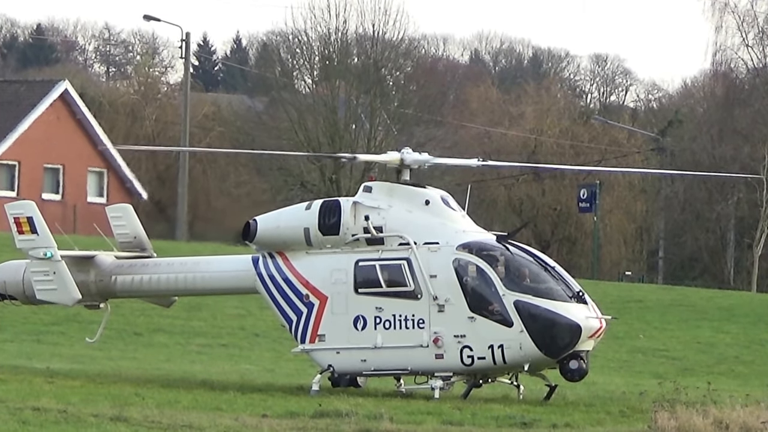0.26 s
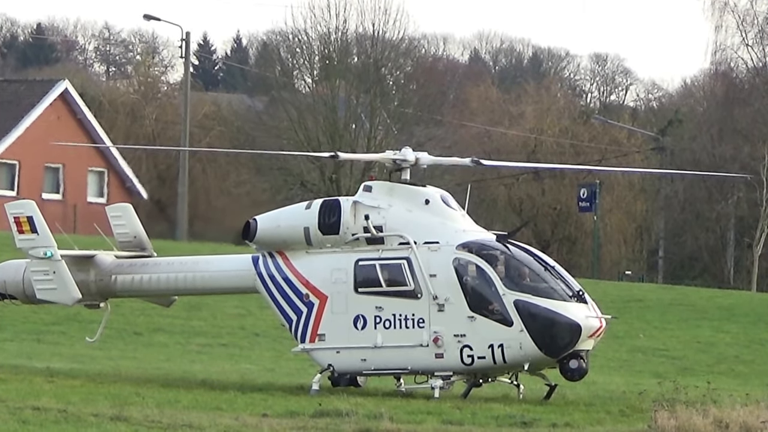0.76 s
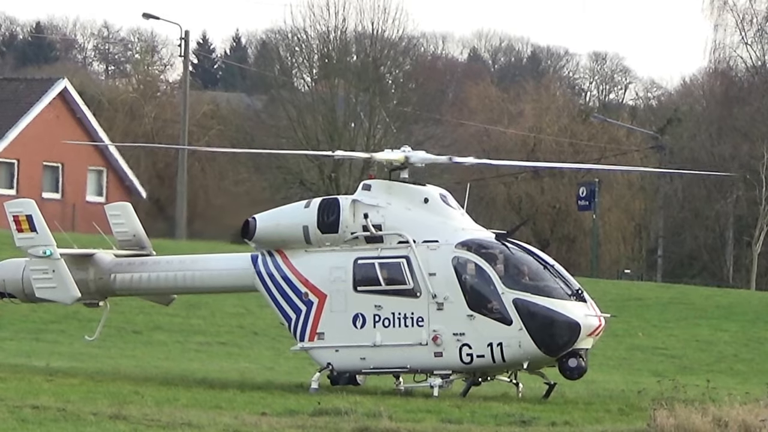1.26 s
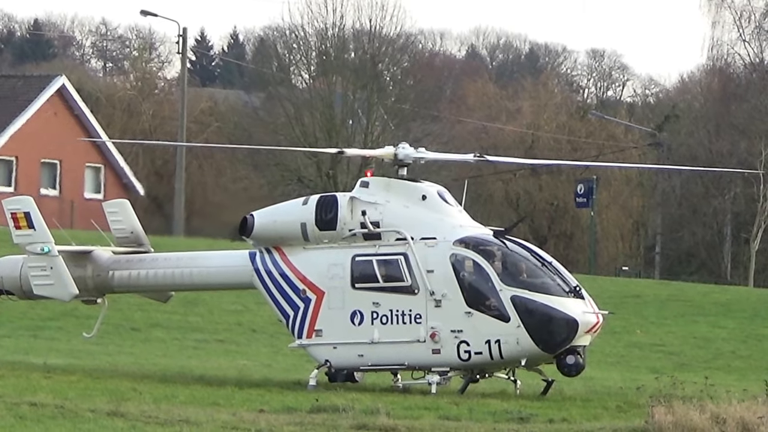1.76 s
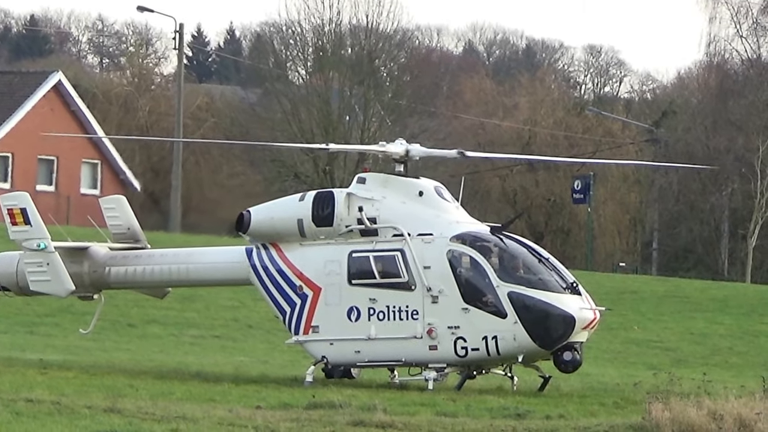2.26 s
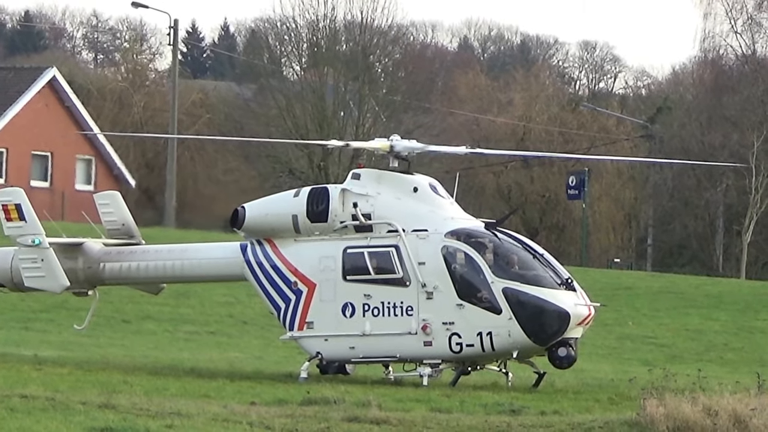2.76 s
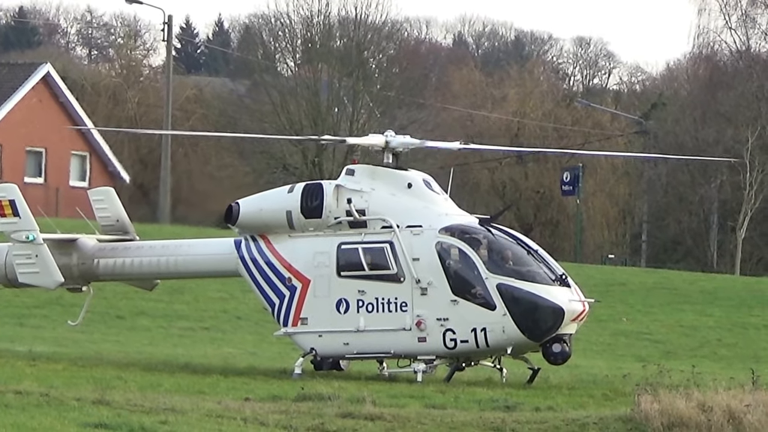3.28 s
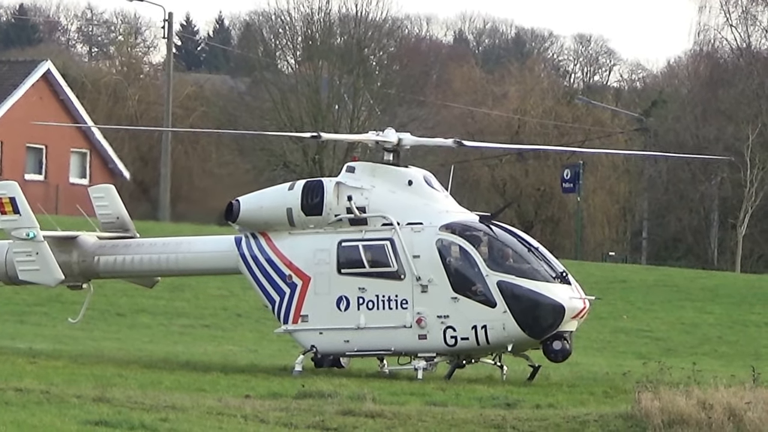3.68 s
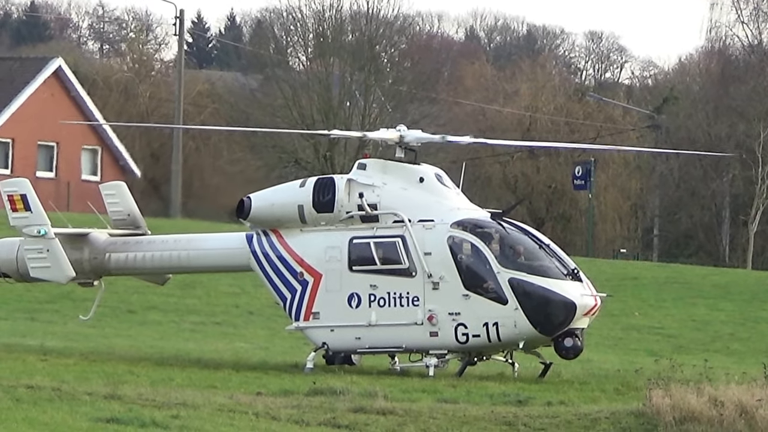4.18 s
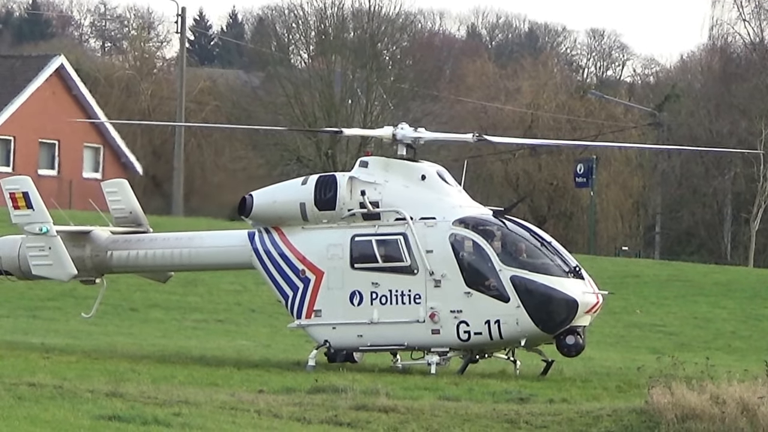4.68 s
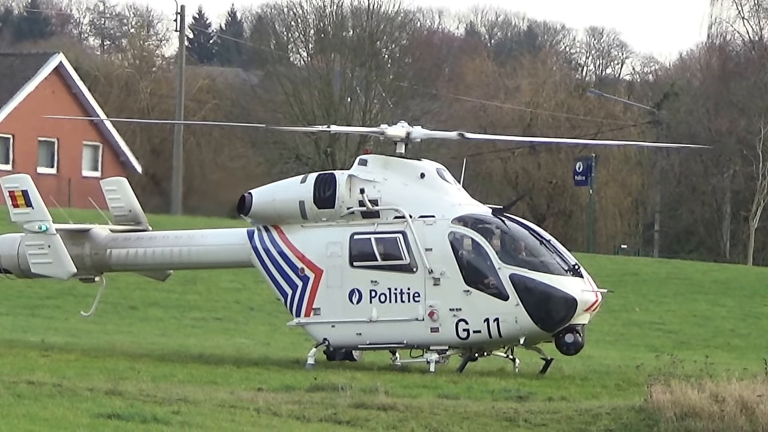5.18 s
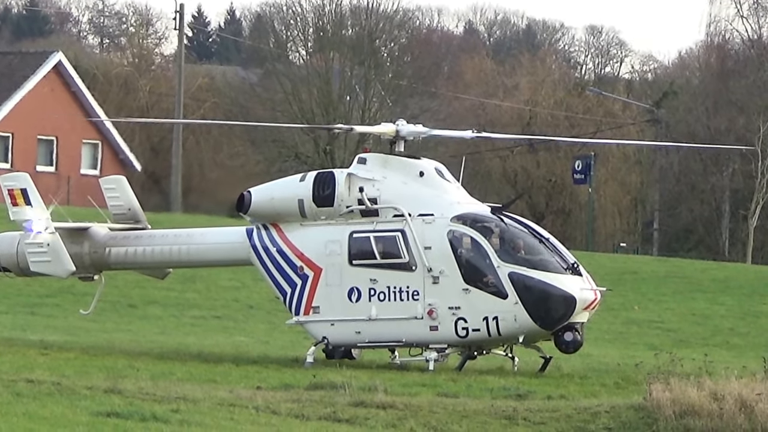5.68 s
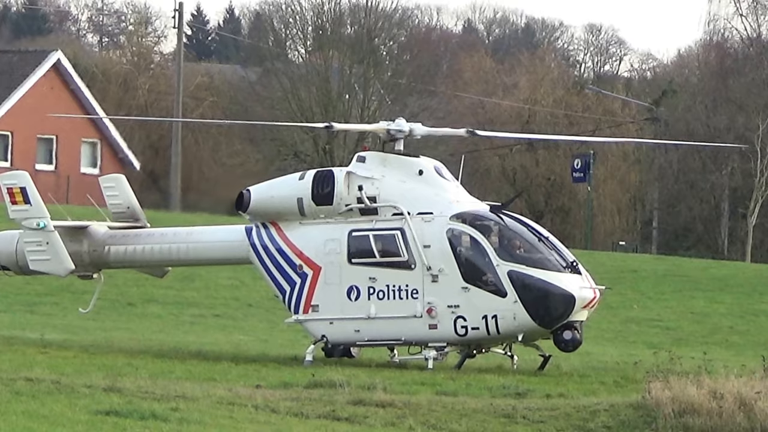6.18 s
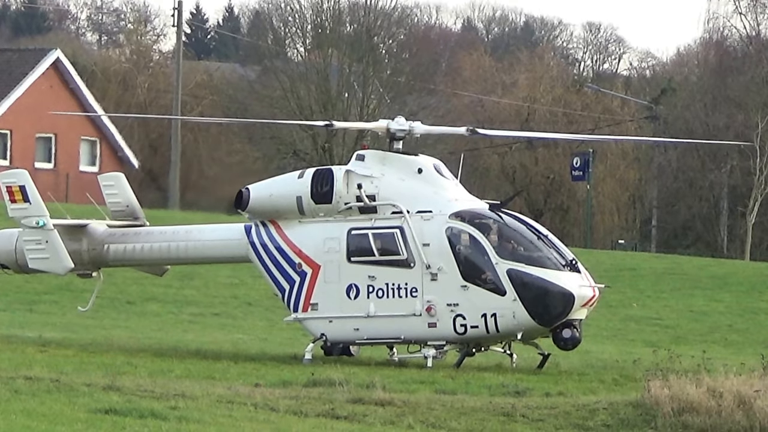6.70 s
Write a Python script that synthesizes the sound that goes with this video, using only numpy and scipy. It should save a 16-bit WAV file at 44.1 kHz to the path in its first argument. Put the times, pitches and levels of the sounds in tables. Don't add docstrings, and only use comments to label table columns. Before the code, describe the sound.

A parked helicopter runs its turbines on open grass some tens of metres away. Rushing gas makes a dense, bright roar and hiss that never stops, swelling and fading unevenly as moving air bends the treble. A thin high whine and a faint steady gear hum sit within it. Around one second a tiny rustle flicks close on the right. The outdoor stereo is narrow, with little deep bass.

```python
import sys
import numpy as np
from scipy import signal
from scipy.fft import rfft, irfft, next_fast_len
from scipy.io import wavfile
from scipy.ndimage import uniform_filter1d, map_coordinates

SR = 44100
rng = np.random.default_rng(int(sys.argv[2]) if len(sys.argv) > 2 else 0)


def persist_wave(psi):
    counts = np.round(np.clip(psi, -1, 1) * 32767).astype(np.int16)
    wavfile.write(sys.argv[1], SR, np.atleast_2d(counts).T)


def field_ratio(decibels):
    return 10 ** (np.asarray(decibels, dtype=float) / 20)


N = 306054


def unit(x):
    return x / np.sqrt(np.mean(x ** 2) + 1e-20)


def along(points, hz):
    f, v = np.transpose(points)
    return np.interp(np.log(hz + 1), np.log(f + 1), v)


def curves(rows, t):
    s, *cols = np.transpose(rows)
    return np.array([np.interp(t, s, c) for c in cols])


def wobble(rate):
    knots = rng.standard_normal(int(N * rate / SR) + 4)
    return map_coordinates(knots, [np.arange(N) * rate / SR])


def filtered(x, response):
    m = next_fast_len(N + 8192)
    spectrum = rfft(x, m) * response(np.fft.rfftfreq(m, 1 / SR))
    return irfft(spectrum, m)[..., :N]


def tone(hz, drift_hz, rough_db):
    phase = 2 * np.pi * np.cumsum(hz + drift_hz * wobble(14)) / SR
    return np.sqrt(2) * field_ratio(rough_db * wobble(25)) * np.sin(phase)


def rustle():
    # t/s, f/Hz, level/dB
    puff = [
        (.955, 6000, -74),
        (.972, 6300, -40),
        (.994, 7600, -43),
        (1.015, 8000, -55),
        (1.03, 8300, -70),
    ]
    hz, db = curves(puff, np.arange(N) / SR)
    fuzz = unit(filtered(rng.standard_normal(N), lambda f: 1 / (1 + (f / 450) ** 4)))
    carrier = np.sqrt(2) * np.sin(2 * np.pi * np.cumsum(hz) / SR)
    return field_ratio(db) * fuzz * carrier


def gearbox():
    # t/s, f/Hz, level/dB
    mesh_track = [(0.03, 762.8, -51), (0.05, 762.6, -47.5), (0.59, 762.3, -51), (0.86, 762.5, -45),
                  (0.93, 762.3, -54), (1.16, 762.1, -47), (1.41, 762.4, -50), (1.47, 762.2, -43.5),
                  (2.88, 762.2, -49.5), (3.01, 762.3, -45), (5.01, 762.3, -46), (5.44, 762.3, -54.5),
                  (6.77, 762.1, -44.5), (6.94, 762.8, -49)]
    # f/Hz, level/dB
    faint_tones = [(607, -58.5), (920, -68), (1380, -59.5), (1496, -53.5), (1526, -56), (2300, -54)]
    mesh_hz, mesh_db = curves(mesh_track, np.arange(N) / SR)
    hum = field_ratio(mesh_db) * tone(mesh_hz, drift_hz=0.74, rough_db=0.5)
    for hz, db in faint_tones:
        level = field_ratio(db + 0.76 * wobble(2.83))
        hum = hum + level * tone(hz, drift_hz=3, rough_db=1.0)
    return hum


def patches(shape, bins, frames):
    across_pitch = uniform_filter1d(rng.standard_normal(shape), size=bins, axis=0)
    return unit(uniform_filter1d(across_pitch, size=frames, axis=1))


def passing(rows, octaves, hz, t):
    s, centre_hz, length, db = np.transpose(rows)[..., None]
    in_pitch = np.exp(-2 * (np.log2((hz + 1) / centre_hz) / octaves) ** 2)
    in_time = np.exp(-2 * ((t - s) / length) ** 2)
    return in_pitch.T @ (db * in_time)


def eddies(x, patchy_db, strand_db):
    # t/s, gain of short waves/dB
    gusts = [(0.19, 2.0), (0.72, 0), (0.83, 0.0), (1.28, -2.5), (1.62, 7), (1.96, 6.5), (2.44, 4.5),
             (2.51, 1.9), (2.97, 0), (3.5, -4), (4.23, -6.5), (4.57, 1.1), (4.87, -4.8), (5.69, 2),
             (6.03, 1.5), (6.15, 4.5), (6.54, -4.5), (6.81, 5.5)]
    # t/s, f/Hz, passage/s, gain/dB
    lenses = [(0.07, 3840, 0.39, 3.1), (0.07, 9620, 0.25, 3), (0.55, 5150, 0.53, 9.5),
              (1.61, 1620, 0.79, 3.5), (1.72, 5570, 0.2, 6.7), (2.0, 8150, 0.15, 7.4), (3.02, 770, 0.21, 2),
              (3.09, 1900, 0.32, 4), (3.14, 7050, 0.08, 5.5), (3.55, 6000, 0.2, 7.5),
              (3.59, 2530, 0.37, 6.5), (3.62, 9350, 0.1, 6.5), (4.2, 11630, 0.19, 4),
              (4.23, 2010, 0.26, 2.0), (4.38, 3530, 0.14, 4.5), (4.73, 5250, 0.38, 4.5),
              (5.28, 5870, 0.35, 6.5), (5.33, 10840, 0.07, 4.5), (5.58, 9210, 0.12, 9.5),
              (5.96, 2090, 0.44, 3.3), (6.45, 3650, 0.3, 2), (6.53, 800, 0.15, 2.1), (6.56, 12480, 0.11, 5),
              (6.84, 5600, 0.11, 5)]
    # t/s, f/Hz, passage/s, loss/dB
    shadows = [(0.04, 1120, 1.36, 5), (0.31, 2100, 0.37, 3), (0.74, 6500, 0.35, 6.5),
               (0.94, 3020, 0.62, 4.5), (1.69, 7560, 0.44, 5.5), (1.86, 520, 0.98, 2.7),
               (2.29, 2660, 0.55, 6.5), (2.72, 1340, 0.46, 1.5), (2.97, 2560, 0.17, 8),
               (3.17, 5480, 0.11, 2.9), (3.69, 3300, 0.2, 4.5), (4.45, 7590, 0.11, 5),
               (4.54, 1090, 0.89, 3.5), (5.14, 4770, 0.29, 4), (5.16, 8010, 0.1, 3.7), (5.35, 583, 0.63, 6),
               (5.39, 2150, 0.088, 2.3), (5.76, 7760, 0.59, 5.5), (6.06, 2640, 0.37, 6.5),
               (6.64, 1700, 0.29, 4), (6.8, 7150, 0.12, 3.1)]
    # t/s, f/Hz, passage/s, gain/dB
    wisps = [(0.05, 2980, 0.61, -6), (0.98, 1910, 0.33, -2), (1.18, 5750, 0.16, 3.5),
             (1.22, 2210, 0.22, 3.5), (1.37, 2480, 0.28, -3), (1.38, 4820, 0.16, -3.5),
             (1.51, 4260, 0.21, 5), (1.83, 5500, 0.15, -4), (2.1, 3420, 0.17, -6.5), (2.24, 6030, 0.13, -3),
             (2.32, 7100, 0.17, 2.5), (2.64, 7310, 0.13, 4), (2.7, 11600, 0.11, -4.3),
             (3.32, 7060, 0.14, -3), (3.47, 12090, 0.41, 6), (3.83, 8810, 0.11, 5), (4.04, 3930, 0.12, 5),
             (4.11, 3210, 0.16, -6), (4.15, 6490, 0.15, 4.5), (4.34, 7910, 0.16, -3.5),
             (4.54, 7690, 0.14, 4.5), (4.71, 11460, 0.17, 4), (4.92, 1860, 0.19, -2.3),
             (5.62, 3890, 0.32, 2.5), (5.7, 2980, 0.32, -3), (5.71, 12080, 0.15, -2.0),
             (5.92, 4900, 0.13, -4), (6.38, 2290, 0.2, -6), (6.83, 3100, 0.21, -3), (6.86, 11460, 0.1, 4.5)]
    # t/s, gain/dB
    whistle = [(0, -1.5), (.45, 1), (.75, 2), (1.1, 3), (1.25, -2), (1.45, -1), (1.55, 2.5), (1.9, 1.5),
               (2.05, -0.5), (3.0, 1), (3.7, -2), (4.35, 2), (5.0, -0.5), (6.1, 0), (6.4, 1), (6.52, -2),
               (6.65, 0.5), (6.94, -0.5)]
    whistle_hz, whistle_width_hz = 4720, 230
    eddy_octaves, wisp_octaves = 0.71, 0.28

    hz, t, z = signal.stft(x, SR, nperseg=1024)
    gust_share = along([(1150, 0), (4700, 1)], hz)[:, None]
    field = gust_share * curves(gusts, t)
    field = field + passing(lenses, eddy_octaves, hz, t)
    field = field - passing(shadows, eddy_octaves, hz, t)
    field = field + passing(wisps, wisp_octaves, hz, t)
    near_whistle = np.exp(-2 * ((hz[:, None] - whistle_hz) / whistle_width_hz) ** 2)
    field = field + near_whistle * curves(whistle, t)
    field = field - 10 * np.log10(np.mean(field_ratio(field) ** 2, axis=1, keepdims=True))
    field = field * along([(11500, 0.99), (13500, 0.62)], hz)[:, None]

    chance = patchy_db * patches(field.shape, 16, 8)
    chance = chance + strand_db * patches(field.shape, 2, 90)
    depth = along([(700, 0.13), (4000, 0.98)], hz)[:, None]
    share = np.array([1, .45])[:, None, None]
    moved = z * field_ratio(share * field + depth * chance)
    return signal.istft(moved, SR, nperseg=1024)[1][..., :N]


def whine():
    # t/s, level/dB
    blade_level = [(0, -56), (.4, -48), (1.1, -45), (1.6, -49), (2.3, -51), (3.1, -48), (3.6, -53),
                   (4.2, -54), (4.8, -52), (5.3, -48), (6.2, -44), (6.5, -50.5), (6.94, -49)]
    t = np.arange(N) / SR
    level = field_ratio(curves(blade_level, t)[0] + 1.6 * wobble(2.2))
    return level * tone(9097 + 2 * t, drift_hz=4.8, rough_db=3)


def ducts(hz):
    # f/Hz, level per Hz/dB
    roar = [(25, -47), (75, -37), (115, -23), (205, -18.5), (330, -33), (560, -20), (1000, -18),
            (1500, -15), (2600, -6), (4500, -2.5), (6300, -9.5), (8200, -5), (10700, -12.5), (15000, -45)]
    # f/Hz, width/Hz, lift/dB
    resonances = [(660, 484, 7.5), (1222, 167, 6.5), (1375, 85, 3.5), (1480, 91, 5.5), (1675, 210, 8.5),
                  (1883, 100, 5), (2100, 67, 6), (2274, 84, 3.5), (2480, 160, 7.5), (2775, 180, 7),
                  (3200, 45, 5), (3423, 96, 6), (3574, 44, 2.5), (3740, 91, 4.5), (4080, 89, 4.5),
                  (4349, 35, 3), (4440, 22, 6.5), (4595, 60, 5.5), (4688, 76, 7), (4837, 162, 6),
                  (5330, 510, 6), (5910, 130, 5.5), (6430, 360, 3), (6730, 35, 0.5), (6900, 59, 2),
                  (7529, 110, 5.5), (8120, 300, 3.5), (8670, 190, 2.5), (9400, 263, 2), (10757, 35, 0)]
    lift = sum(db / (1 + (2 * (hz - c) / w) ** 2) for c, w, db in resonances)
    return field_ratio(along(roar, hz) + lift)


def gas_flow():
    noise = filtered(rng.standard_normal((2, N)), ducts)
    duct_rms = np.sqrt(np.mean(ducts(np.linspace(0, SR / 2, 4000)) ** 2))
    return field_ratio(-23.0) * noise / duct_rms


def turbines():
    # f/Hz, level/dB
    apart = [(500, -24.5), (950, -17), (1300, -22.5), (1700, -18), (2100, -19), (2400, -20), (3000, -20.5),
             (4600, -17.5), (6600, -20.5), (7500, -22.5), (9100, -26), (9600, -24.5), (14000, -32)]
    flow = gas_flow()
    sources = np.array([flow[0] + whine(), flow[1]])
    direct, scattered = eddies(sources, patchy_db=1.01, strand_db=0.8)
    return direct, filtered(scattered, lambda hz: field_ratio(along(apart, hz)))


def scene():
    # f/Hz, difference/dB
    shade = [(600, 0), (1000, 1), (1350, 0.7), (1650, 3), (2050, 0), (2250, 1.5), (2700, -1.1), (4200, 1),
             (4500, 1), (4900, 1.5), (5300, 0.5), (7000, 0), (9000, -1.5), (9700, 0)]
    # f/Hz, phase lead/rad
    lead = [(600, 0), (900, 0.23), (1500, 0.015), (1700, -.2), (2150, 0), (2400, -0.24), (3000, -0.0055),
            (4300, 0.14), (5100, -0.19), (6000, 0.0048), (7300, -0.19), (9500, 0)]

    def ports(hz):
        half = field_ratio(along(shade, hz) / 2) * np.exp(.5j * along(lead, hz))
        return np.array([half, 1 / half])

    direct, side = turbines()
    front = filtered(direct + gearbox(), ports)
    return front + np.array([side, -side]) + rustle() * field_ratio([[-14], [4]])


def low_pass(x):
    return signal.sosfilt(signal.butter(12, 14990, fs=SR, output="sos"), x)


def record(dry):
    rounded = dry / (1 + np.abs(dry / .62) ** 5) ** (1 / 5)
    return low_pass(rounded)


dry = scene()
out = record(dry)
persist_wave(out)
```